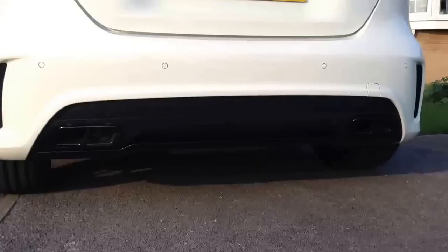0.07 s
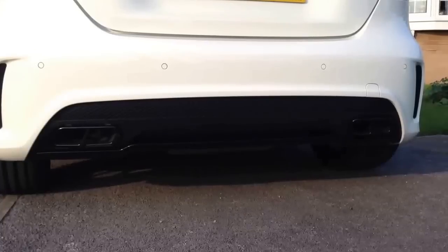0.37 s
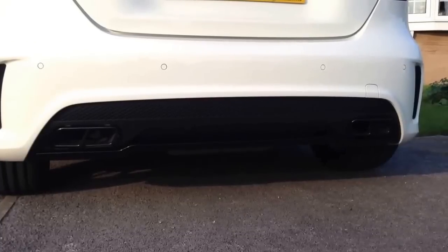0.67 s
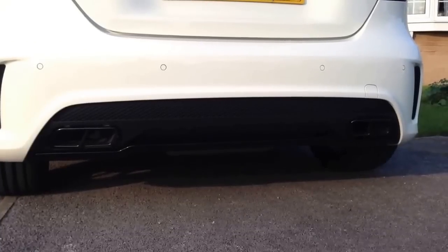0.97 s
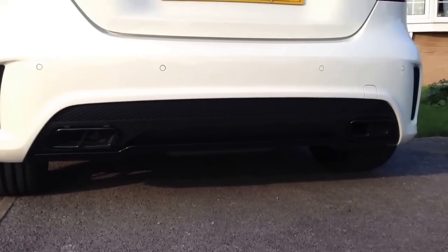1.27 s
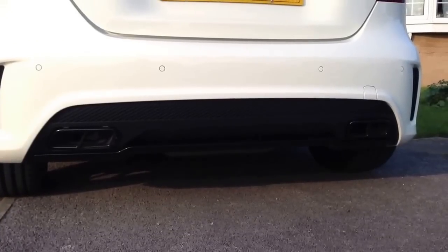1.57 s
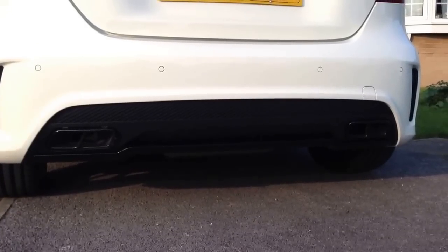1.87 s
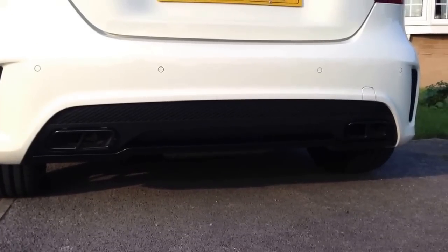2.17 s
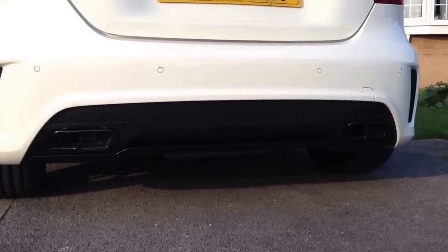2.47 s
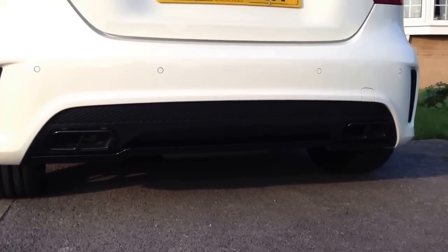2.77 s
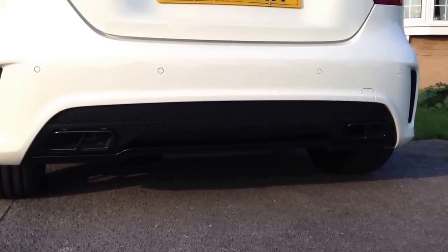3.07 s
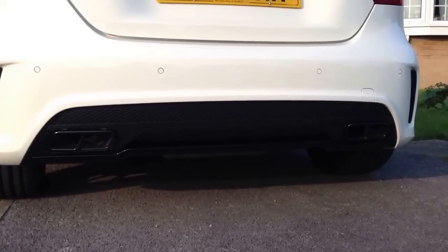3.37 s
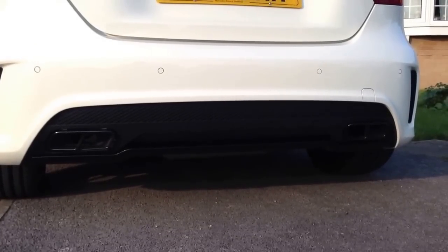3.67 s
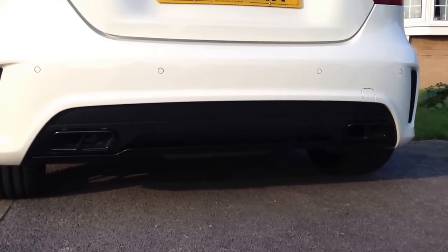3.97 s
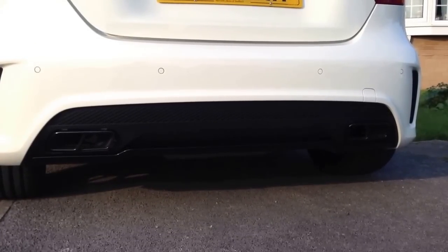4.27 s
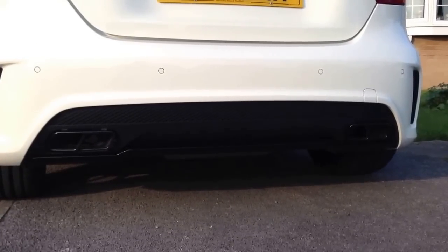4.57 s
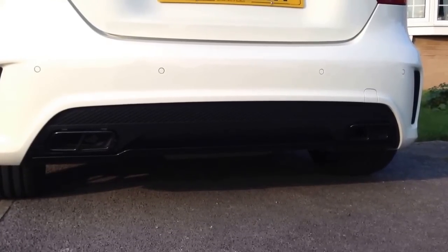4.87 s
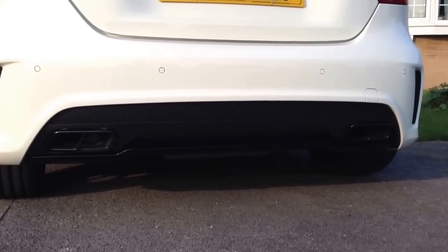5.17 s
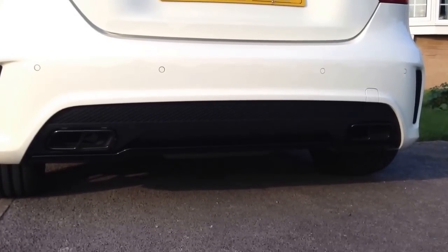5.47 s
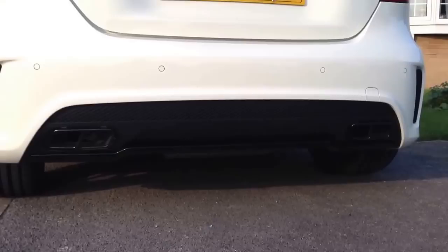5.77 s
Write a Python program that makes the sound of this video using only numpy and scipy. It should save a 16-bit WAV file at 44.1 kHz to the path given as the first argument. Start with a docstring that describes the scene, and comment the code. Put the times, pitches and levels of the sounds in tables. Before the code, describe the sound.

A turbocharged four-cylinder car is revved in five short blips on a driveway, heard close behind the tailpipes. Each rev rises in a deep boom with a raspy growl, then sinks into a sputtering rumble. Exhaust pops follow, light at first, with the sharpest bangs after the last three revs. Gas hisses and chuffs from the pipes, and the turbo chirps faintly early on.

```python
"""A driveway, one microphone just behind the tailpipes of a turbocharged four-cylinder car.
The throttle is blipped five times: the firing pulses boom in the silencer and rasp in the pipe.
As the revs sink the engine sputters, and unburnt fuel pops and bangs in the exhaust.
Gas hisses and chuffs out of the pipes, and the turbo chirps faintly.
Rasp and bangs echo briefly off car, ground and house; a limiter ducks the loudest peaks."""
import sys
import numpy as np
from scipy import signal
from scipy.fft import rfft, irfft
from scipy.io import wavfile
from scipy.ndimage import uniform_filter1d, minimum_filter1d

SR = 44100
rng = np.random.default_rng(int(sys.argv[2]) if len(sys.argv) > 2 else 0)


def generate_wav(sig):
    """Save sig (samples, or channels by samples) to the path in sys.argv[1] as 16-bit PCM at SR."""
    pcm = np.round(np.clip(np.atleast_2d(sig).T, -1, 1) * 32767).astype(np.int16)
    wavfile.write(sys.argv[1], SR, pcm)


N = 261072
TIME = np.arange(N) / SR
BITE_S = .035  # how long the load takes to come on

# Throttle blips: climb_s, top_s, firing_gain_hz, bite_s, shut_s, boom_db, rasp_db, growl_db, sputter_db
BLIPS = [(-.1, 0.367, 40.7, 0.099, 0.25, 0.5, -21.5, -44, -27.5),
         (.52, .859, 39.3, 0.612, 0.8, 5, -19, -38, -19.5),
         (1.972, 2.324, 53.1, 2.053, 2.31, 7, -14, -23, -24.5),
         (2.975, 3.43, 62.9, 3.03, 3.41, 4, -18.5, -26.5, -27),
         (4.519, 4.851, 43.6, 4.59, 4.825, 6, -16, -22, -23.5)]


def boom(cycles, flutter=0.022, lope=0.04):
    """The lowest orders sweep through the silencer's resonances; unequal cylinders add half orders."""
    # Strength of an engine order under load, and while coasting: pitch_hz, level_db
    loaded = [(60, -29), (72, -6.5), (85, -10.5), (105, -9), (130, -6.5), (150, -3), (172, -11.5),
              (200, -21.5), (235, -26.5), (272, -42), (297, -26.5), (319, -13.5), (347, -17), (385, -43.5),
              (425, -26), (460, -23), (500, -29.5)]
    coasting = [(65, -26), (85, -15.5), (105, -14), (130, -17.5), (148, -19.5), (168, -39), (188, -27.5),
                (200, -30.5), (215, -42), (280, -55.5), (300, -38), (319, -28), (340, -35.5), (375, -57.5)]
    # Strength of the firing off the throttle: time_s, gain_db
    off_throttle = [(.05, -4), (.4, -4.5), (.9, -4.5), (1.05, 5), (1.3, -4), (1.55, 4), (1.9, -2),
                    (2.42, -14), (2.55, 3), (2.7, -5.5), (2.95, -4), (3.55, 3), (3.95, -6.5), (4.17, 4),
                    (4.5, 0), (5.0, 2.5), (5.15, -6.5), (5.58, -1), (5.75, -2), (5.9, 3)]
    *_, boom_db, _, _, _ = np.transpose(BLIPS)
    pull = load(boom_db, swell_db_per_s=38, fall_db_per_s=205.5)
    idle, rate_hz = gain_curve(off_throttle), firing_rate()
    wave = np.zeros(N)
    for k in range(1, 5):
        level = np.hypot(pull * amp(read(loaded, k * rate_hz)), idle * amp(read(coasting, k * rate_hz)))
        wave -= level * (1 + flutter * wander(hz=31)) * np.sin(2 * np.pi * k * cycles)
    return wave * (1 + lope * np.sin(np.pi * cycles) + 0.027 * np.sin(np.pi * cycles / 2))


def rasp_and_growl(cycles):
    """Under throttle the pulses growl in the pipe and steepen into a buzz with ragged little shocks."""
    # Tone of the growl and of the rasp: frequency_hz, gain_db
    growl_tone = [(200, -44), (380, 1.5), (470, -0.5), (560, -6.5), (690, 7), (850, -3.5), (1100, -9),
                  (1600, -9), (2500, -24.5), (5000, -80.5)]
    rasp_tone = [(150, -13), (400, 4.5), (800, -4), (1200, 2.5), (1900, 2.5), (2700, -7.5), (3300, -15),
                 (3900, -25.5), (6000, -44), (12000, -57)]
    # Firings that bang under throttle: start_s, level_db
    shocks = [(0.7613, -15), (2.0875, -17), (2.1799, -14.5), (2.2213, -4), (3.351, -14), (4.6331, -14),
              (4.776, -15), (4.8068, -11), (4.841, -12)]
    growl = unit(colour(firings(cycles, uneven_db=2, jitter_s=.00002), growl_tone, pipe=.8))
    buzz = firings(cycles, uneven_db=2, jitter_s=.00001)
    ragged = .6 * firings(cycles, uneven_db=4, jitter_s=.0003) + .75 * puffs(cycles, fade=.3, floor=.12)
    # the silencer's chambers smear each shock over a few milliseconds
    scatter = rng.standard_normal(160) * np.exp(-TIME[:160] / .001)
    chambers = irfft(np.exp(1j * np.angle(rfft(scatter, 1024))))[:512]
    smeared = signal.oaconvolve(buzz + ragged, chambers)[:N]
    rasp = unit(colour(smeared, rasp_tone, pipe=0.89))
    *_, rasp_db, growl_db, _ = np.transpose(BLIPS)
    out = rasp * load(rasp_db, swell_db_per_s=49, fall_db_per_s=290)
    out += growl * load(growl_db, swell_db_per_s=113.5, fall_db_per_s=190)
    for start_s, db in shocks:
        add(out, start_s, amp(db) * crack(rasp_tone, treble_db=-8.5, flame=0.23, flame_s=0.0033))
    return out


def pops(thump_hz=115, thump_s=0.0029, ring_hz=322, ring_s=0.014, rise_s=0.0062):
    """Each pop of unburnt fuel cracks in the pipe, thumps the silencer and rings the pipe's low mode."""
    # Afterfire, with a gain for each part: start_s, crack_db, thump_db, ring_db
    afterfire = [(0.4075, -29.5, -28, -19), (0.9237, -25, -23, -8.5), (0.9589, -27.5, -25, -7),
                 (1.002, -15.5, -15, -2.5), (1.0789, -12.5, -7, -1.5), (1.0927, -15, -23, 1.5),
                 (1.109, -10, -21, -1.5), (1.171, -9.5, -13, -21), (1.193, -13, -21, -19),
                 (1.245, -22, -30, -7), (1.3207, -11, -13, -26), (1.9736, -18, -2.5, -10.5),
                 (2.482, -23, -29, -6.5), (2.5, -24.5, -22.5, -5.5), (2.607, 0, -18, 0),
                 (2.618, -1, -12, -36), (2.7403, -1.5, -23, -34), (2.806, -11, -3.5, -4.5),
                 (2.8358, -9.5, -9.5, -13), (2.871, -22.5, -31, -30), (3.446, -23.5, -22, -3.5),
                 (3.5661, -1.5, -2.5, -11), (3.654, -4.5, -4.5, -5), (3.6686, -8, -14, -11),
                 (3.8593, -18.5, -21, -15), (3.912, -14, -14, -28), (3.955, -13, -16, -23),
                 (3.97, -12, -23, -30), (5.0145, -13, -13, -31), (5.0558, -2.5, -3, -3),
                 (5.0693, -1.5, -17, -24), (5.118, -15, -43, -38), (5.187, -23, -6, -23),
                 (5.239, -21.5, -22, -44), (5.252, -18, -16.5, -34), (5.354, -25.5, -13, -32.5),
                 (5.409, -12.5, -17, -22), (5.458, -26, -22, -27)]
    # Tone of the crack: frequency_hz, gain_db
    crack_tone = [(100, -1), (400, -9), (700, -2), (1200, -3), (1900, -2), (3100, -0.5), (3800, -11.5),
                  (4800, -15.5), (6500, -31.5), (9000, -42.5), (15000, -52)]
    out, t = np.zeros(N), TIME[:SR // 6]
    thump = np.sin(2 * np.pi * thump_hz * t) * t / thump_s * np.exp(1 - t / thump_s)
    ring = np.sin(2 * np.pi * ring_hz * t) * (np.exp(-t / ring_s) - np.exp(-t / rise_s))
    for start_s, crack_db, thump_db, ring_db in afterfire:
        treble_db = -2.5 + 1.82 * crack_db  # weaker pops are duller
        bang = crack(crack_tone, treble_db, flame=0.15, flame_s=0.0046)
        add(out, start_s, amp(crack_db) * bang + amp(thump_db) * thump + amp(ring_db) * ring)
    return out


def crack(tone, treble_db, flame, flame_s):
    """A shock front and a short turbulent flame, rung through the pipe; rms 1 at its loudest."""
    t = TIME[:SR // 6]
    burst = flame * rng.standard_normal(len(t)) * np.exp(-t / flame_s)
    burst[0] += 1
    sound = colour(burst, tone, pipe=0.94, treble_db=treble_db)
    return sound / np.sqrt(uniform_filter1d(sound ** 2, size=176).max())


def sputter(cycles, always_db=-44, loaded_db=-28, stumble_s=0.047, linger_s=0.575, fade_s=0.098):
    """Cylinders fire weakly or out of time, mostly just after a blip: lumps rumble in the silencer."""
    # Tone of the rumble: frequency_hz, gain_db
    rumble_tone = [(22, -32), (40, -13), (60, -4), (85, 0.5), (150, 2.5), (190, -10), (250, -27),
                   (320, -15), (400, -26.5), (700, -25), (1500, -69)]
    # The engine stumbles as the load changes: centre_s, level_db
    stumbles = [(.04, -27), (.42, -17.5), (2.03, -20), (4.53, -14.5), (5.9, -25.5)]
    lumps = firings(cycles, uneven_db=11.5, jitter_s=0.002984)
    rumble = unit(colour(lumps - lumps.mean(), rumble_tone, pipe=0.94))
    steady = rumble / np.sqrt(uniform_filter1d(rumble ** 2, size=4000) + 0.12)
    spells = [amp(db) * np.exp(-((TIME - centre_s) / stumble_s) ** 2) for centre_s, db in stumbles]
    for _, _, _, bite_s, shut_s, *_, sputter_db in BLIPS:
        end_s = shut_s + linger_s
        times = [bite_s - BITE_S, bite_s, shut_s, shut_s + fade_s, end_s, end_s + fade_s]
        gains = [0, *amp([loaded_db, loaded_db, sputter_db, sputter_db]), 0]
        spells.append(np.interp(TIME, times, gains))
    return (amp(always_db) + np.max(spells, axis=0)) * steady


def gas_flow(cycles):
    """Soft pulses burble through the pipe while gas hisses out of its mouth, harder in each blip."""
    # Flow from the tailpipes, apart from the rush of each blip: time_s, relative_db
    base_flow = [(.05, -58.5), (.5, -58), (.95, -54), (1.45, -53.5), (1.94, -59.5), (2.1, -51.5),
                 (2.4, -58), (2.6, -55), (2.95, -59), (3.6, -54.5), (4.2, -53), (4.5, -56), (5, -52),
                 (5.5, -55.5), (5.9, -59)]
    # Tone of the burble and of the hiss: frequency_hz, gain_db
    burble_tone = [(25, -13.5), (70, 14), (150, 9.5), (260, 1), (420, -1), (800, 2), (2000, -5),
                   (3200, -12), (5000, -34), (9000, -54)]
    hiss_tone = [(400, -10), (2000, 11.5), (4500, 4), (6000, -2), (8000, -7), (11000, -13.5), (15000, -21)]
    *_, rasp_db, _, _ = np.transpose(BLIPS)
    rush = load(rasp_db - 29, swell_db_per_s=40, fall_db_per_s=250)
    gas = np.hypot(gain_curve(base_flow), rush)
    pulses = puffs(cycles, fade=0.94, floor=0.95) + 0.16 * firings(cycles, uneven_db=7, jitter_s=.00005)
    burble = unit(colour(pulses, burble_tone, pipe=0.74))
    hiss = unit(colour(puffs(cycles, fade=1, floor=1), hiss_tone))
    return amp(19.5) * np.minimum(gas, amp(-53.5)) * burble + amp(7) * gas * hiss


def chuffs(rise_s=0.0073, push_hz=140, push_db=19):
    """Gas leaves the pipes in soft bursts: a wide hiss on a low push."""
    # Bursts of gas: start_s, level_db
    bursts = [(1.3844, -41), (1.9781, -25.5), (2.0334, -28.5), (3.8596, -27), (3.8856, -33), (4.5131, -40),
              (4.5531, -39.5), (5.089, -28.5), (5.432, -40), (5.4959, -44.5)]
    # Tone of their hiss: frequency_hz, gain_db
    chuff_tone = [(200, -9), (1000, 5), (3000, 5.5), (6000, -3.5), (9000, -11.5), (15000, -23.5)]
    out, t = np.zeros(N), TIME[:SR // 8]
    swell = t / rise_s * np.exp(1 - t / rise_s)
    push = amp(push_db) * np.sin(2 * np.pi * push_hz * t)
    for start_s, db in bursts:
        hiss = unit(colour(rng.standard_normal(len(t)), chuff_tone))
        add(out, start_s, amp(db) * swell * (hiss + push))
    return out


def turbo_chirps():
    """Thin, breathy falling whistles of the turbo."""
    # Whistles: start_s, length_s, start_hz, end_hz, level_db
    chirps = [(.355, 0.031, 7000, 6500, -54), (.6, 0.027, 6800, 6450, -54), (.76, 0.18, 4930, 4680, -46.5),
              (1.123, 0.066, 7660, 6940, -54), (1.182, .07, 6100, 5950, -55),
              (1.52, 0.074, 6200, 5960, -57), (2.4, 0.084, 7650, 6650, -62)]
    out, waver = np.zeros(N), .025 * wander(hz=200)
    for start_s, length_s, start_hz, end_hz, db in chirps:
        count = round(length_s * SR)
        hz = np.linspace(start_hz, end_hz, count) * (1 + waver[:count])
        add(out, start_s, amp(db) * np.hanning(count) * np.sin(2 * np.pi * np.cumsum(hz) / SR))
    return out


def driveway(x, echoes_per_s=2500):
    """Scattered echoes reach the microphone from the car, the ground and the house."""
    # Time the echoes take to fall by 60 dB: frequency_hz, decay_s
    decay = [(100, 0.14), (1000, 0.13), (3000, 0.11), (10000, 0.12)]
    t = TIME[:SR // 2]
    taps = rng.standard_normal(len(t)) * (rng.random(len(t)) < echoes_per_s / SR) * (t > .003)
    hz, delay_s, bands = signal.stft(taps, SR, nperseg=256)
    tail = signal.istft(bands * amp(-60 * delay_s / read(decay, hz)[:, None]), SR, nperseg=256)[1]
    return signal.fftconvolve(x, tail / np.linalg.norm(tail))[:N]


def firing_rate(base_hz=59.5, drag_hz_per_s=35.86):
    """Firings per second: each blip pulls the revs up smoothly against a steady drag."""
    gained_hz = np.zeros(N)
    for climb_s, top_s, gain_hz, *_ in BLIPS:
        progress = np.clip((TIME - climb_s) / (top_s - climb_s), 0, 1)
        gained_hz += gain_hz * (1 - np.cos(np.pi * progress)) / 2
    return base_hz - drag_hz_per_s * TIME + gained_hz


def load(levels_db, swell_db_per_s, fall_db_per_s):
    """Each blip bites, swells to its level as boost builds, then dies away once the throttle shuts."""
    out = np.zeros(N)
    for (_, _, _, bite_s, shut_s, *_), db in zip(BLIPS, levels_db):
        attack = np.clip((TIME - bite_s) / BITE_S + .5, 0, 1)
        before_s, after_s = np.maximum(shut_s - TIME, 0), np.maximum(TIME - shut_s, 0)
        out += attack * amp(db - swell_db_per_s * before_s - fall_db_per_s * after_s)
    return out


def firings(cycles, uneven_db, jitter_s):
    """One click a firing, uneven in size and timing."""
    due = np.flatnonzero(np.diff(np.floor(cycles)))
    size, late = rng.standard_normal((len(due), 2)).T
    place = np.clip(np.round(due + late * jitter_s * SR).astype(int), 0, N - 1)
    return unit(np.bincount(place, amp(uneven_db * np.clip(size, -2, 1.5)), N))


def puffs(cycles, fade, floor):
    """Turbulence that flares at each firing and fades over a share of the cycle."""
    return unit((floor + np.exp(-(cycles % 1) / fade)) * rng.standard_normal(N))


def colour(x, tone, pipe=0, treble_db=0, size=4096):
    """Causal filter: a broad tone, a share of the pipe's resonances and a treble shelf."""
    # Resonances and notches of the exhaust pipe at pipe=1: centre_hz, width_hz, lift_db
    resonances = [(314.8, 44, 18.5), (483.5, 31, 7.5), (632, 57, 8.5), (773, 113, -13), (912, 45, 3.5),
                  (1004, 53, 5), (1120.5, 62, 14.5), (1248, 25, 3), (1324, 112, -8.5), (1432, 32, 3.5),
                  (1614, 98, 6), (1922, 207, 14), (2390, 40, -11.5), (2520, 110, 10), (2970, 150, 0.5),
                  (3150, 350, 6)]
    hz = np.fft.rfftfreq(size, 1 / SR)
    pipe_db = sum(lift / (1 + (2 * (hz - centre) / width) ** 2) for centre, width, lift in resonances)
    shelf_db = treble_db / (1 + (2300 / (hz + 1)) ** 8)
    cepstrum = irfft(np.log(amp(read(tone, hz) + pipe * pipe_db + shelf_db)))
    # minimum phase: the ringing follows each pulse
    cepstrum[1:size // 2] *= 2
    cepstrum[size // 2 + 1:] = 0
    return signal.oaconvolve(x, irfft(np.exp(rfft(cepstrum))))[:len(x)]


def wander(hz):
    """Random drift of rms 1, up to the given rate."""
    return unit(irfft(rfft(rng.standard_normal(N)) / (1 + (np.fft.rfftfreq(N, 1 / SR) / hz) ** 4), N))


def amp(db):
    """Decibels to gain."""
    return 10 ** (np.asarray(db) / 20)


def unit(x):
    """Scales to an rms of 1."""
    return x / np.sqrt(np.mean(x ** 2) + 1e-20)


def read(points, hz):
    """Reads a spectrum on a log-frequency axis."""
    point_hz, value = np.transpose(points)
    return np.interp(np.log(hz + 1), np.log(point_hz + 1), value)


def gain_curve(points):
    """Rows of time_s, level_db as a gain over the whole scene."""
    return amp(np.interp(TIME, *np.transpose(points)))


def add(mix, start_s, sound):
    """Mixes a sound in at its start time."""
    part = mix[max(round(start_s * SR), 0):][:len(sound)]
    part += sound[:len(part)]


def limiter(x, ceiling_db=-0.5, recover_db_per_s=23):
    """Turns the gain down at once on a loud peak and lets it creep back."""
    over_db = np.maximum(20 * np.log10(abs(x).max(axis=0) + 1e-9) - ceiling_db, 0)
    creep_db = recover_db_per_s * TIME
    duck_db = np.maximum.accumulate(over_db + creep_db) - creep_db
    return x * amp(uniform_filter1d(minimum_filter1d(-duck_db, size=90), size=90))


def scene():
    """The exhaust at close range, in mono: one crankshaft times boom, rasp, sputter and burble."""
    cycles = np.cumsum(firing_rate()) / SR  # one cycle a firing
    sharp = rasp_and_growl(cycles) + pops()
    low = boom(cycles) + sputter(cycles)
    echoes = amp(-8.5) * driveway(sharp)
    return (low + sharp + echoes + gas_flow(cycles) + chuffs() + turbo_chirps())[None]


def record(dry, knee=.8, silent_until_s=.034, cutoff_hz=15400):
    """After the microphone: a limiter, rounded peaks, an instant of opening silence and a low-pass."""
    x = limiter(dry)
    over = np.maximum(abs(x) - knee, 0)
    rounded = np.sign(x) * (abs(x) - over + (1 - knee) * np.tanh(over / (1 - knee)))
    lowpass = signal.firwin(511, cutoff_hz, window=("kaiser", 9), fs=SR)
    return signal.oaconvolve(rounded * (TIME > silent_until_s), lowpass[None], "same")


dry = scene()
out = record(dry)
generate_wav(out)
```